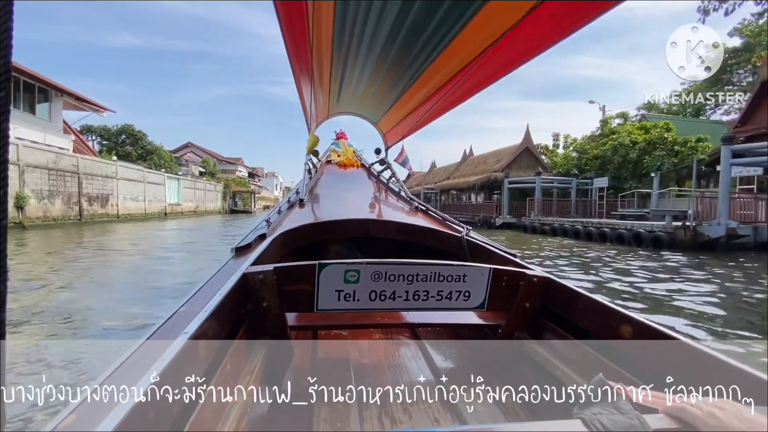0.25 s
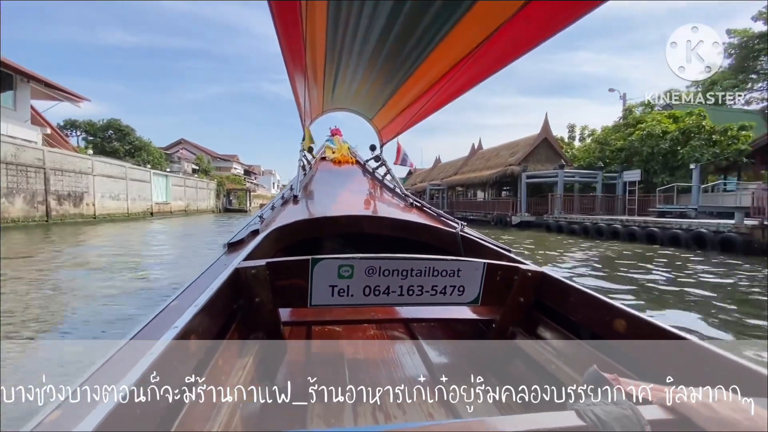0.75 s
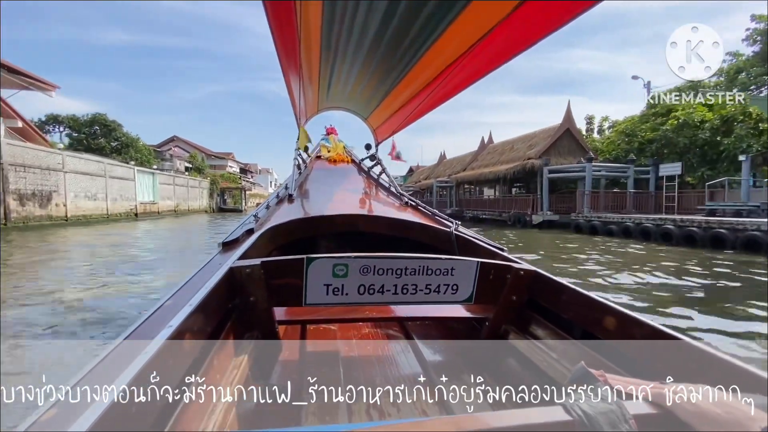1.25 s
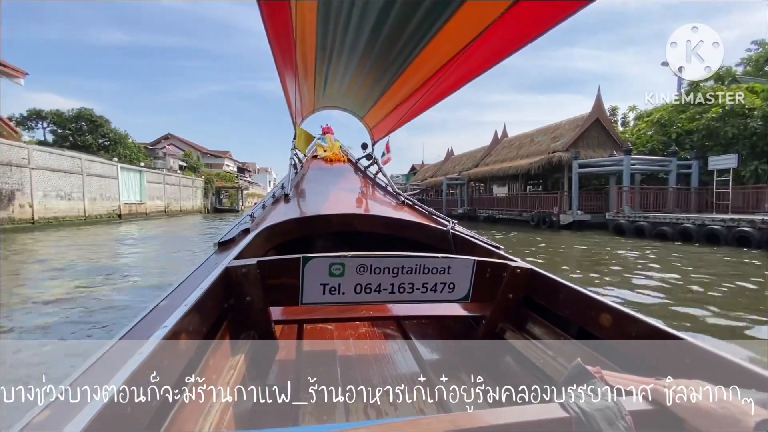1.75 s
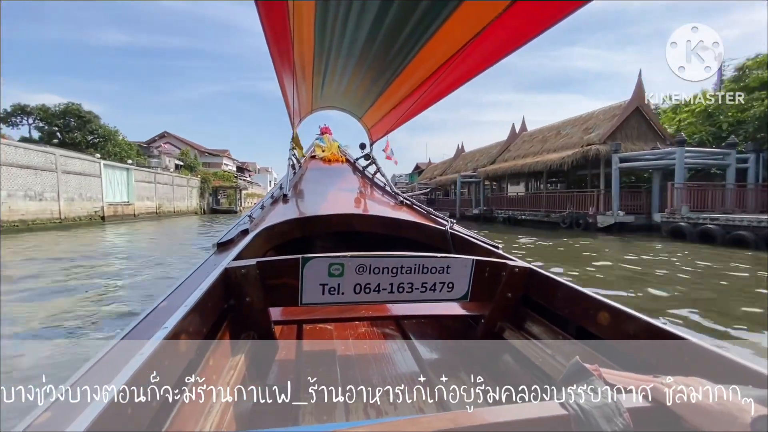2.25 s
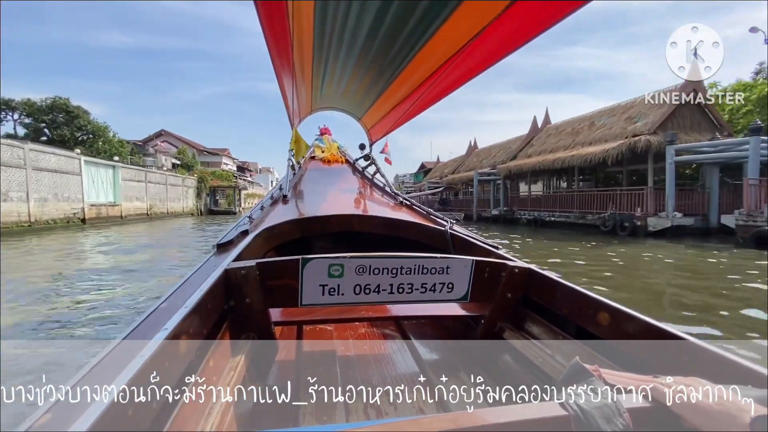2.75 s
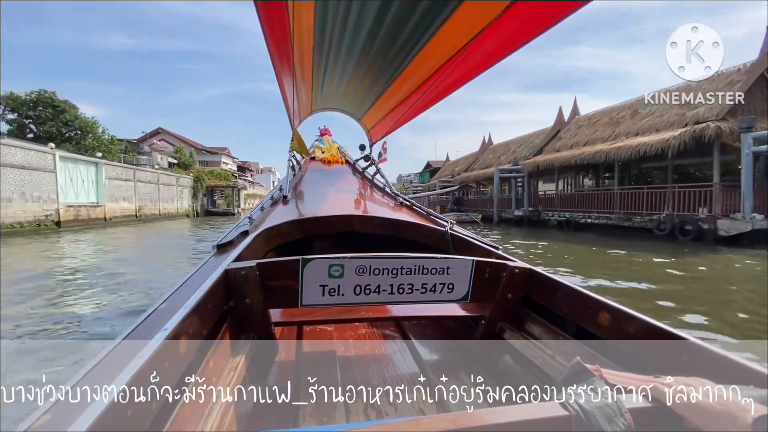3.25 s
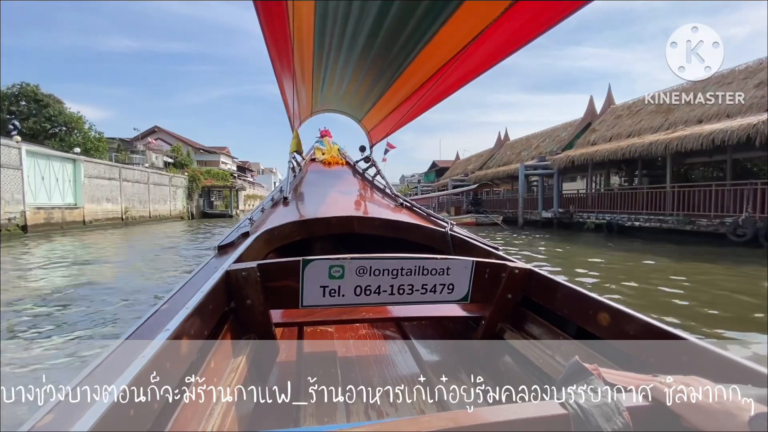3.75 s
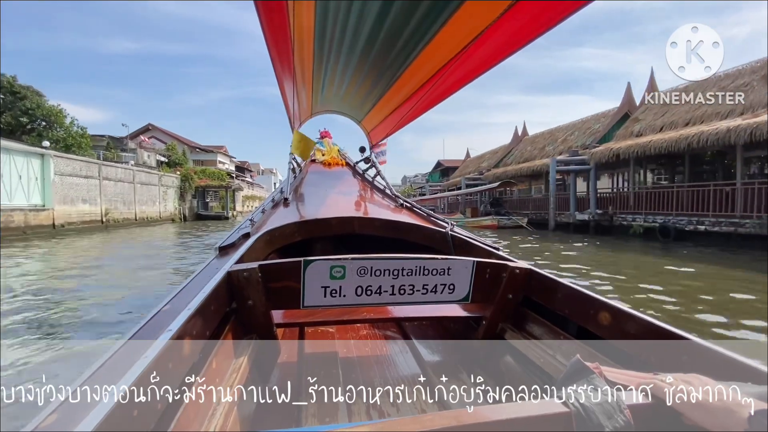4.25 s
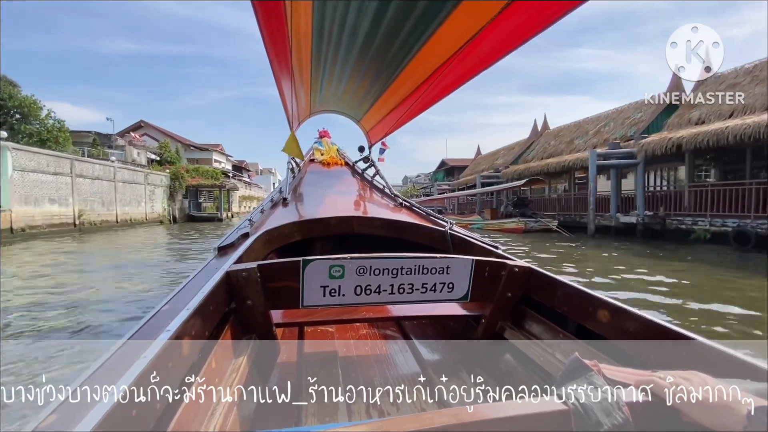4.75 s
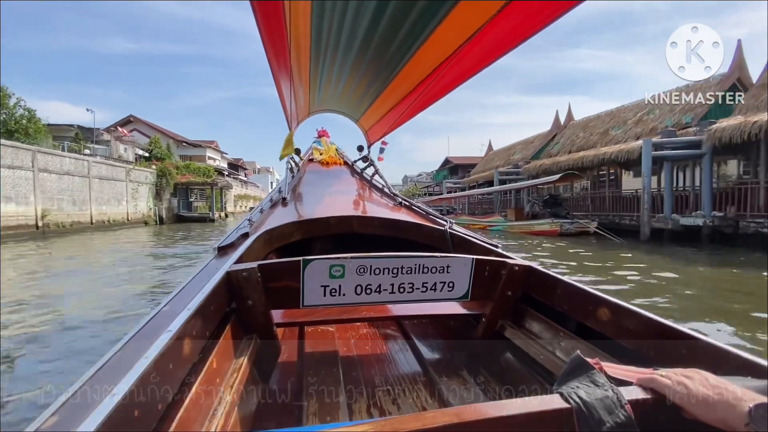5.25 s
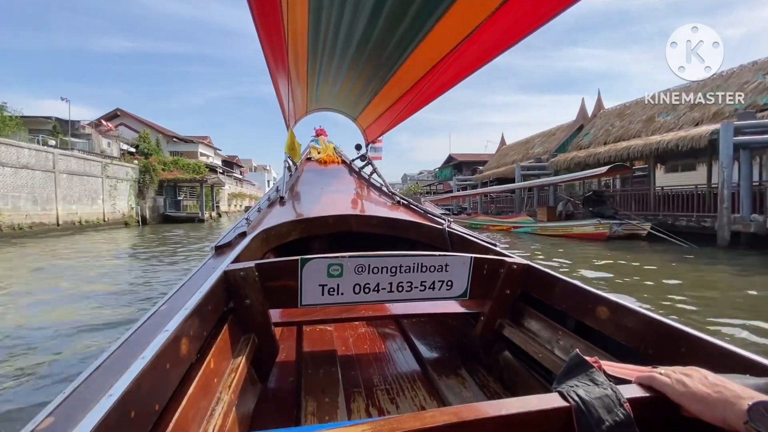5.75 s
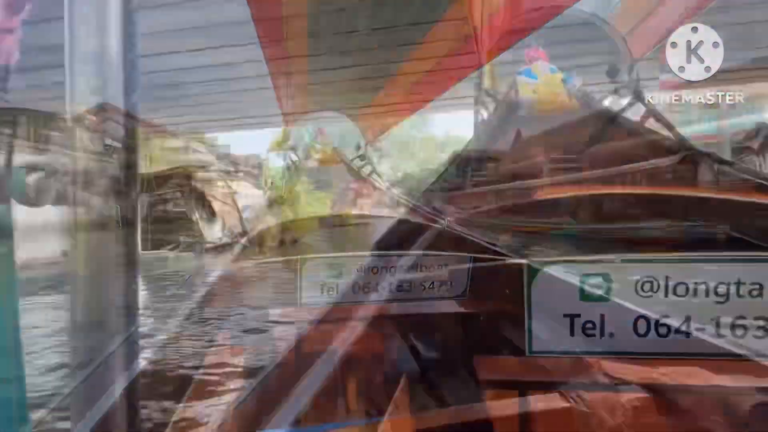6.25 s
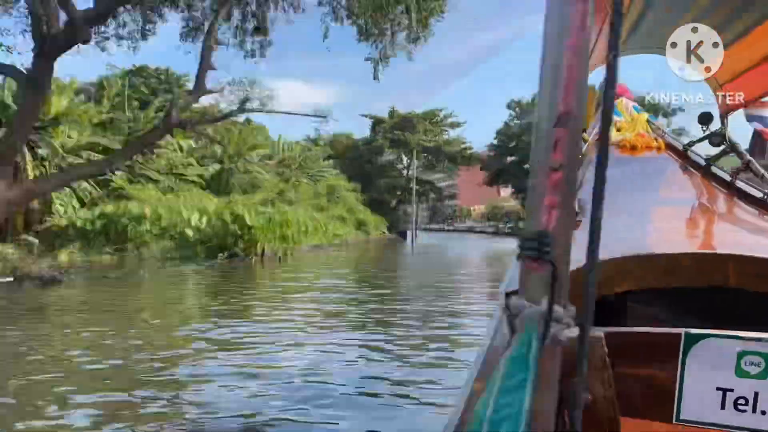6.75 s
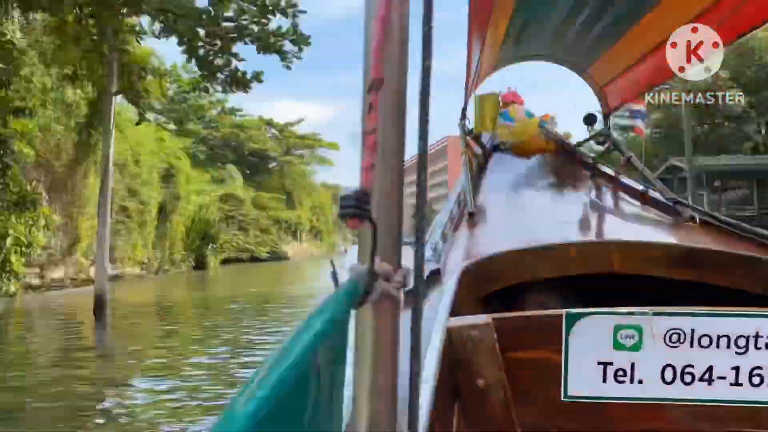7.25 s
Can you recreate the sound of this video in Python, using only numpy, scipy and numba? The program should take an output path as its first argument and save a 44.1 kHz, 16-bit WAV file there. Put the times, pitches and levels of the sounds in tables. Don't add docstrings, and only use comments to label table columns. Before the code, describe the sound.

Outdoors on a canal, with a stereo microphone at a passenger seat: rapid low engine pulses, rough hull boom, bubbling propeller wash and bright spray. Chop pounds irregularly underneath. The motor speeds up and gets more clattery in the middle, slows again, and water splashes strongest near six seconds. The boat fades away, followed by a tiny gap and the onset of a horn over dull rumble.

```python
import sys
import numpy as np
from scipy import signal
from scipy.fft import rfft, irfft, next_fast_len
from scipy.io import wavfile
from scipy.ndimage import uniform_filter1d
from numba import njit

SR = 44100
rng = np.random.default_rng(int(sys.argv[2]) if len(sys.argv) > 2 else 0)


def wav_out(sig):
    wavfile.write(sys.argv[1], SR, np.round(np.clip(np.atleast_2d(sig).T, -1, 1) * 32767).astype(np.int16))


def ratio(d):
    e = np.asarray(d, float) / 20
    return 10 ** e


N = 330745

FADE_END_S = 7.285
# t/s, level/dB
NEXT_RISE = [
    (7.398, -29),
    (7.415, -14),
    (7.435, -17),
    (7.452, -5.5),
    (7.5, 7.5),
]


def ramp(table):
    s, *columns = np.transpose(table)
    return [np.interp(np.arange(N) / SR, s, c) for c in columns]


def at(table, hz):
    f, v = np.transpose(table)
    return np.interp(np.log(hz + 1), np.log(f + 1), v)


def unit(x):
    return x / np.sqrt(np.mean(x ** 2))


def walk(rate):
    k = int(SR / rate)
    held = np.repeat(rng.standard_normal(N // k + 1), k)
    return uniform_filter1d(uniform_filter1d(held, k), k)[:N]


def noise_pair():
    return rng.standard_normal((2, N))


def ring(x, hz, width_hz):
    return signal.lfilter(*signal.iirpeak(hz, hz / width_hz, fs=SR), x)


def swells(rows):
    t, out = np.arange(N) / SR, 0
    for s, rise_s, fall_s, height in rows:
        away = np.where(t < s, (s - t) / rise_s, (t - s) / fall_s)
        out = out + height * np.cos(np.pi / 2 * np.clip(away, 0, 1)) ** 2
    return out


def over(floor_db, rows):
    humps = swells([(s, rise_s, fall_s, ratio(db) ** 2) for s, rise_s, fall_s, db in rows])
    return 10 * np.log10(ratio(floor_db) ** 2 + humps)


def wide(mid, side, shape, flicker_db, flicker_rate, shared_db, astern):
    # f/Hz, level/dB
    width = [(60, -11.5), (110, -9.5), (200, -5), (380, -1), (700, 2.5), (1290, 0), (2380, 2.5), (4400, 0),
             (8120, 0), (15000, 0.5)]
    # f/Hz, level/dB
    port_lean = [(60, -2.5), (110, 3), (200, 1), (380, 3.5), (700, 2.0), (1290, 2.0), (2380, 2.0),
                 (4400, 4.5), (8120, 4), (15000, -5)]
    size = next_fast_len(N)
    hz = np.arange(size // 2 + 1) * SR / size
    lo_hz, hi_hz = shape[0][0], shape[-1][0]
    gain = ratio(at(shape, hz)) * (hz > lo_hz) * (hz < hi_hz)
    mid, side = rfft(mid, size), rfft(side, size)
    own = np.sqrt(1 - np.clip(astern, 0, 1) ** 2)
    side = (own * side - 1j * astern * mid) * ratio(at(width, hz))
    lean = ratio(at(port_lean, hz) / 2)
    pair = np.array([(mid + side) * lean, (mid - side) / lean]) * gain
    out, shared = 0, shared_db * walk(flicker_rate)
    for octave in np.arange(np.log2(lo_hz), np.log2(hi_hz) + 1):
        window = np.cos(np.pi / 2 * np.clip(np.log2(hz + 1) - octave, -1, 1)) ** 2
        band = irfft(pair * window, size)[:, :N]
        out = out + band * ratio(shared + flicker_db * walk(flicker_rate))
    return out / np.sqrt(np.mean(out.mean(axis=0) ** 2))


def engine(hz, orders_db):
    cycle = np.cumsum(hz * (1 + 0.0039 * walk(12))) / SR
    tones = 0
    for k, db in enumerate(orders_db):
        level = ratio(db - 1.42 * k + (0.8 + 0.75 * k) * walk(14))
        phase = 2 * np.pi * (k + 1) * cycle + 0.39 * k + 0.12 * k * walk(14)
        tones = tones + level * np.sqrt(2) * np.cos(phase)
    return tones, cycle


def throb(hz, load):
    # t/s, rise/s, fall/s, level/dB
    drones = [
        (.08, .1, 0.092, -30),
        (.5, 0.21, 0.28, -31),
        (1.47, .06, 0.066, -36),
        (1.87, 0.16, .3, -23.5),
        (4.12, 0.064, 0.079, -30.5),
        (5.75, 0.22, .4, -27.5),
        (6.25, .1, 0.13, -26.5),
        (6.75, 0.16, .15, -30),
    ]
    first_db = -30.5 + 1.11 * (hz - 41)
    second_db = -40.5 + 19 * load
    tones, cycle = engine(hz, [first_db, second_db, over(-40.5, drones)])
    left_lag = 10
    return np.array([np.roll(tones, left_lag) * ratio(1.65), tones * ratio(0.25)]), cycle


def hull(cycle):
    # f/Hz, level/dB per Hz
    boom_colour = [(30, -33), (38, -3.5), (60, 3.5), (100, 3.5), (150, -1), (190, -2.5), (240, -5.5),
                   (300, -14.5), (420, -23.5), (550, -47)]
    # f/Hz, width/Hz, level/dB
    plank_modes = [(151.3, 18.7, 0), (190.6, 27.6, 2.5), (232.7, 28, -0.5), (298.2, 18.3, -2)]
    cylinders_db = [-6, -6.5, -1.1, -2]
    firing = cycle.astype(int)
    uneven_db = 5.75 * rng.standard_normal(firing[-1] + 1)[firing]
    blow = ratio(np.array(cylinders_db)[firing % len(cylinders_db)] + uneven_db)
    shake = 0.05 * rng.standard_normal(N)
    knocks = np.diff(firing, prepend=0) * blow + shake
    planks = 0
    for k, (f, w, db) in enumerate(plank_modes):
        planks = planks + (-1) ** k * ratio(db) * ring(ring(knocks, f, w), f, 2 * w)
    boom = wide(*noise_pair(), boom_colour, flicker_db=1.5, flicker_rate=12, shared_db=0.96, astern=.35)
    opposed = ratio(np.array([[.9], [-.9]]))
    return ratio(1.2) * boom + ratio(-6.0) * unit(planks) * opposed


def hull_level(revs):
    # t/s, level/dB
    thumps = [(.01, -30.5), (.3, -32), (.8, -29.5), (1.06, -29.5), (1.25, -26.5), (1.51, -27),
              (1.84, -29.5), (2.12, -24), (2.36, -26), (2.51, -26), (2.62, -39.5), (2.84, -28), (3.2, -27),
              (3.42, -28), (3.54, -24.5), (3.7, -25), (4.17, -24), (4.28, -29.5), (4.5, -25.5),
              (4.9, -24.5), (5.17, -25), (5.3, -27), (5.45, -29.5), (5.66, -26), (5.98, -27.5), (6.1, -27),
              (6.23, -26.5), (6.34, -27.5), (6.58, -23.5), (7.08, -28.5)]
    rise_s, fall_s = 0.084, 0.15
    return over(-30 + 0.28 * revs, [(s, rise_s, fall_s, db) for s, db in thumps])


@njit
def bubbles(start, hz, cycles, size, glide):
    out = np.zeros(N + 4096)
    for k in range(len(start)):
        decay = np.exp(-hz[k] / (cycles[k] * SR))
        n = min(int(5 * cycles[k] * SR / hz[k]), 4000)
        a, p = size[k], 0.
        for i in range(n):
            p += hz[k] * (1 + glide * i / n) / SR
            out[start[k] + i] += a * np.sin(2 * np.pi * p)
            a *= decay
    return out[:N]


def froth(count, lo_hz, hi_hz, cycles, spread_db):
    when, pitch, length, loudness = rng.random((count, 4)).T
    hz = lo_hz * (hi_hz / lo_hz) ** pitch
    start = (when * N).astype(np.int64)
    size = ratio(-spread_db * np.log(1 - loudness)) * np.sqrt(hz)
    return unit(bubbles(start, hz, cycles * (.5 + length), size, 0.28))


def wash(cycle):
    # f/Hz, level/dB per Hz
    wash_colour = [(200, -14), (330, 0.5), (434, -7), (702, -4), (860, -6.5), (1090, -5.5), (1340, -5),
                   (1480, -7.5), (1620, -11.5), (2130, -11.5), (2790, -17), (3070, -21.5), (3500, -20.5),
                   (4680, -49)]
    puff = 1 + 0.088 * np.cos(2 * np.pi * cycle)
    pair = []
    for _ in range(2):
        big_bubbles = froth(count=12000, lo_hz=399.7, hi_hz=3524, cycles=5.72, spread_db=1.5)
        pair.append(puff * rng.standard_normal(N) + 0.37 * big_bubbles)
    return wide(*pair, wash_colour, flicker_db=0.76, flicker_rate=14, shared_db=0.26, astern=0.58)


def casing(hz, cycle):
    # f/Hz, width/Hz, level/dB
    block_modes = [(938, 54, -12), (1321, 72, -10), (2260, 99, -25.5), (3066, 176, -16.5)]
    clatter = (1 + .6 * np.cos(2 * np.pi * cycle)) * noise_pair()
    rings = 0
    for f, w, db in block_modes:
        rings = rings + ratio(db + 0.48 * walk(8)) * unit(ring(ring(clatter, f, w), f, 2 * w))
    return rings * ratio(.4 * (hz - 44.5))


def bow_waves():
    # t/s, rise/s, fall/s, level/dB over calm
    waves = [(0.0, .1, .06, 2.5), (.3, .3, 0.19, 2), (.8, .1, 0.14, 1), (1.26, .3, .1, 2),
             (1.53, .17, 0.24, 4), (1.8, .25, 0.22, 3), (2.03, .3, 0.11, 4), (2.47, .2, 0.38, 3),
             (2.85, .3, 0.31, 3), (3.2, .25, .3, 2.5), (3.6, .35, .4, 2), (4.06, .2, 0.33, 2),
             (4.56, .15, 0.24, 1.5), (4.95, .1, 0.14, 2), (5.17, 0.31, .25, 5), (5.42, 0.22, .14, 4.5),
             (5.78, .22, 0.35, 7), (6.15, .3, 0.28, 4), (6.36, 0.074, .06, 3), (6.52, .08, .08, 2.5),
             (6.7, .25, 0.16, 5), (6.88, .15, .12, 3.5), (7.12, 0.17, 0.16, 3.5)]
    return swells(waves)


def spray():
    # f/Hz, level/dB per Hz
    spray_colour = [(1300, -12.5), (2200, -6), (3500, -8.5), (5000, -8.5), (7180, -10.5), (8300, -14),
                    (9300, -17), (10000, -38)]
    pair = []
    for _ in range(2):
        fizz = froth(count=30000, lo_hz=1494, hi_hz=10020, cycles=5.1, spread_db=1.47)
        pair.append(rng.standard_normal(N) + 0.44 * fizz)
    return wide(*pair, spray_colour, flicker_db=0.7, flicker_rate=20, shared_db=0.4, astern=.15)


def mist():
    # f/Hz, level/dB per Hz
    mist_colour = [(8800, -25.5), (9500, -3), (10800, 0.5), (12400, -3), (14000, -5.5), (15100, -3.5),
                   (16000, -10)]
    return wide(*noise_pair(), mist_colour, flicker_db=0.5, flicker_rate=20, shared_db=0.5, astern=.1)


def slaps():
    # t/s, f/Hz, ring/s, level/dB
    hits = [
        (.697, 560, 0.0045, -18.5),
        (.712, 380, .006, -20),
        (.852, 1230, .004, -22),
        (.896, 150, 0.0055, -11),
        (1.6405, 5750, 0.0013, -22.5),
        (1.67, 251, 0.011, -24.5),
        (2.347, 218, 0.011, -18.5),
    ]
    out = 0
    for s, hz, ring_s, db in hits:
        t = np.maximum(np.arange(N) / SR - s, 0)
        out = out - ratio(db) * np.sin(2 * np.pi * hz * t) * np.exp(-t / ring_s)
    return out


def next_scene():
    # f/Hz, level/dB
    partials = [(274.5, -75), (549.1, -78), (780.6, -84), (925.9, -77.5), (1152, -76), (1389, -82),
                (1733, -78), (1852, -75), (2309, -75), (2789, -82), (2885, -86), (3052, -89), (3246, -86),
                (3451, -94)]
    t = np.arange(N) / SR
    horn = 0
    for hz, db in partials:
        turns = hz * t + rng.random((2, 1)) * 0.38
        horn = horn + ratio(db + 1.0) * np.sqrt(2) * np.sin(2 * np.pi * turns)
    low = ring(ring(noise_pair(), 294, 600), 250, 900)
    rumble = ratio(-66.5) * unit(low) + ratio(-81.5) * unit(ring(noise_pair(), 3000, 4000))
    blast = np.clip((t - 7.432) / .015, 0, 1)
    return (blast * horn + rumble) * ratio(ramp(NEXT_RISE)[0]) * (t > NEXT_RISE[0][0])


def scene():
    # t/s, firing rate f/Hz, load/0-1
    throttle = [(0.1, 42.2, 0.72), (.24, 40.74, 0.36), (.8, 40.68, 0.3), (1.34, 40.92, 0.43),
                (1.54, 39.61, 0.1), (1.8, 41.17, 0), (2.1, 42.06, 0.48), (2.27, 42.31, .7),
                (2.6, 43.32, 0.82), (3.27, 45.54, 0.99), (4.01, 47.73, 0.88), (4.1, 47.42, .1),
                (4.24, 47.14, .9), (4.9, 45.1, 0.96), (5.3, 43.55, 0.89), (5.9, 43.0, 0.85),
                (6.58, 41.5, .55), (7.25, 39.1, 0.35)]
    t = np.arange(N) / SR
    hz, load = ramp(throttle)
    revs = hz - 41
    wave_db = bow_waves()
    pipe, cycle = throb(hz, load)
    wash_db = -33.5 + 0.32 * revs + .18 * wave_db
    spray_db = -45.5 + wave_db + 0.18 * revs + 4.0
    mist_db = -58 + 1.73 * wave_db + 0.17 * revs + 5.0
    water = ratio(spray_db) * spray() + ratio(mist_db) * mist() + slaps()
    boat = pipe + ratio(hull_level(revs)) * hull(cycle)
    boat = boat + ratio(wash_db + 1.34) * (wash(cycle) + casing(hz, cycle)) + water
    fade_zero_s, fade_s, bend = 7.33, 1.423, 1.413
    fade = np.clip((fade_zero_s - t) / fade_s, 0, 1) ** bend
    fade = fade * np.clip((FADE_END_S - t) / 0.03928, 0, 1)
    return boat * fade + next_scene()


def top_cut(x):
    return signal.sosfilt(signal.butter(12, 16850, fs=SR, output="sos"), x)


def keep_bands(x, bands):
    size = next_fast_len(N + SR)
    hz = np.arange(size // 2 + 1) * SR / size
    passed = sum((hz >= lo) & (hz < hi) for lo, hi in bands)
    return irfft(rfft(x, size) * passed, size)[:N]


def record(dry):
    # low f/Hz, high f/Hz
    mid_bands = [(0, 12500), (13750, 15720)]
    # low f/Hz, high f/Hz
    side_bands = [(0, 10350), (11850, 14450)]
    dry = signal.sosfiltfilt(signal.cheby2(6, 18, 33, "high", fs=SR, output="sos"), dry)
    mid = keep_bands(dry[0] + dry[1], mid_bands)
    side = keep_bands(dry[0] - dry[1], side_bands)
    t = np.arange(N) / SR
    gate = np.clip(np.maximum(FADE_END_S - t, t - NEXT_RISE[0][0]) / .012, 0, 1)
    return top_cut(np.array([mid + side, mid - side]) / 2 * gate)


dry = scene()
out = record(dry)
wav_out(out)
```